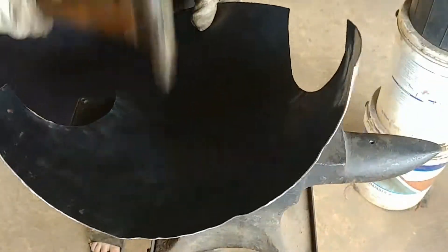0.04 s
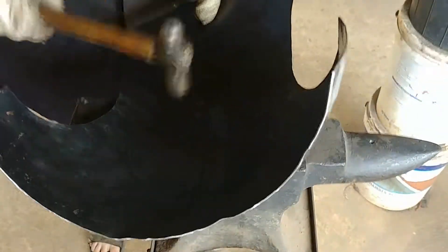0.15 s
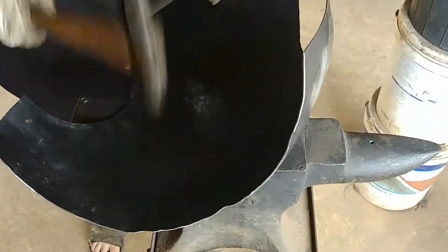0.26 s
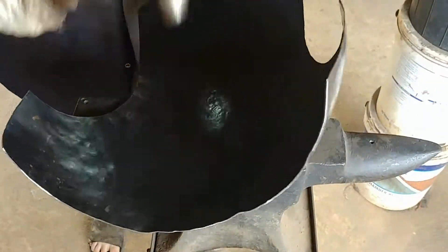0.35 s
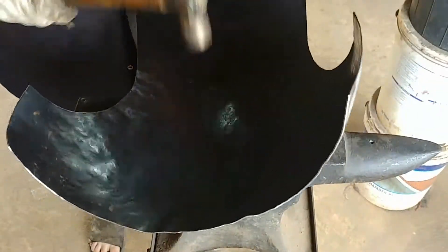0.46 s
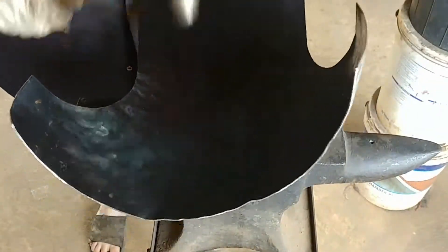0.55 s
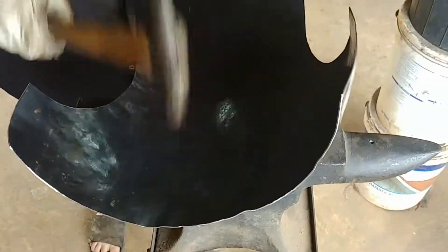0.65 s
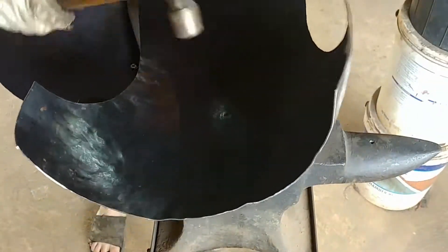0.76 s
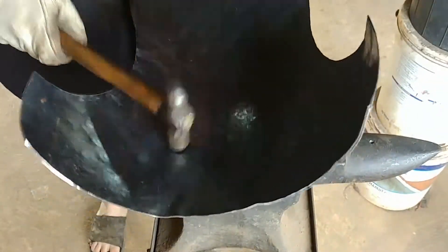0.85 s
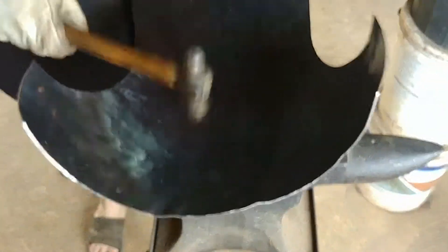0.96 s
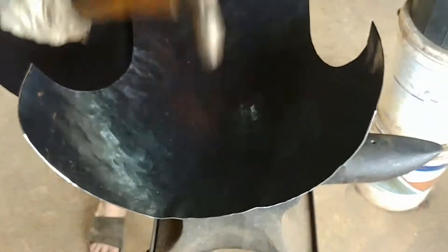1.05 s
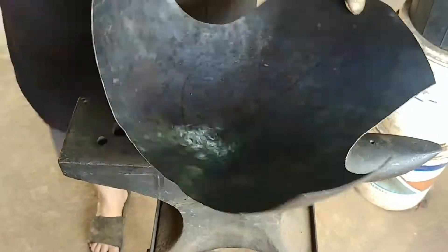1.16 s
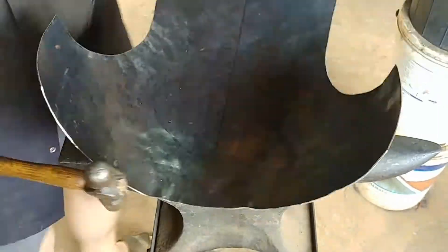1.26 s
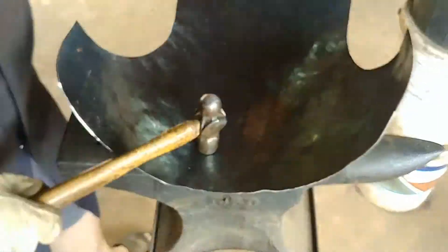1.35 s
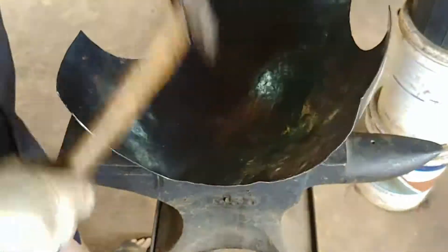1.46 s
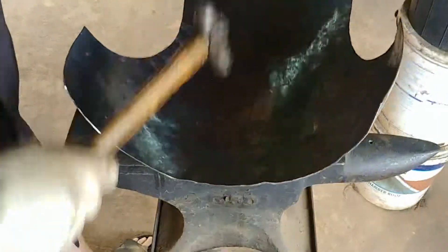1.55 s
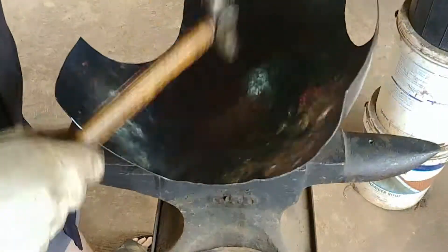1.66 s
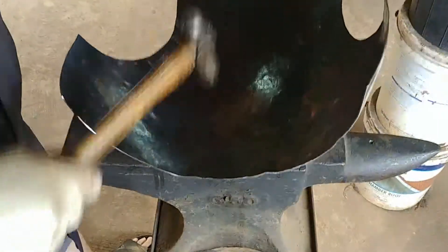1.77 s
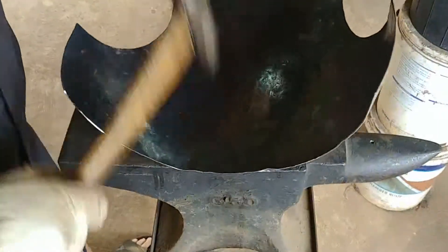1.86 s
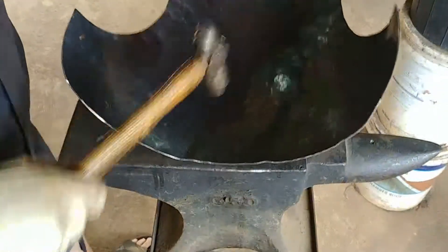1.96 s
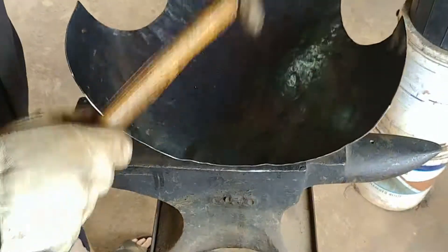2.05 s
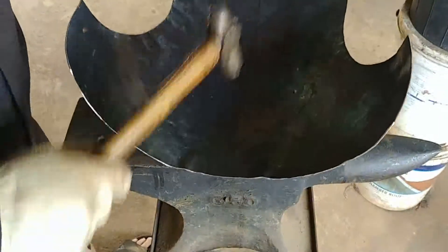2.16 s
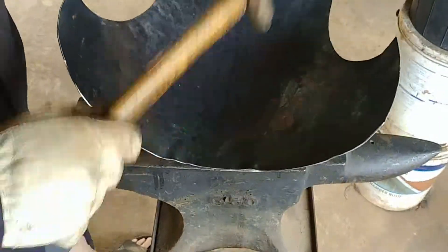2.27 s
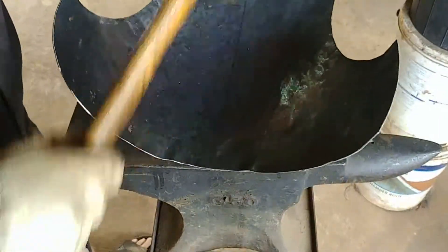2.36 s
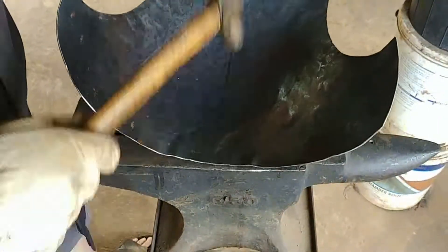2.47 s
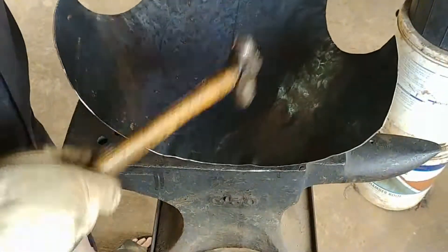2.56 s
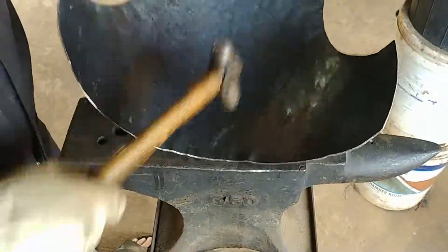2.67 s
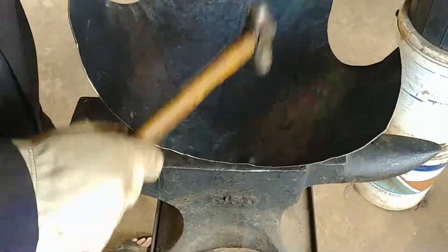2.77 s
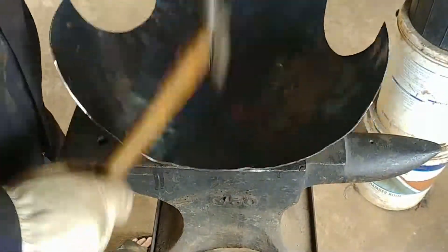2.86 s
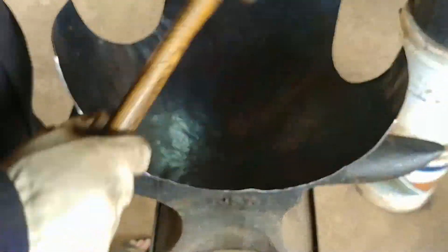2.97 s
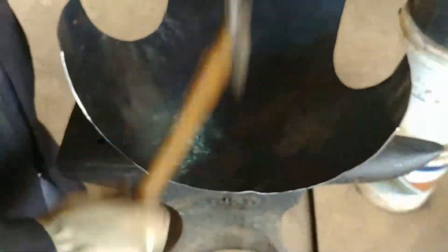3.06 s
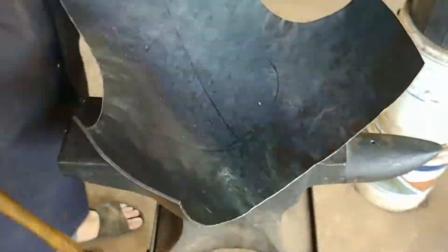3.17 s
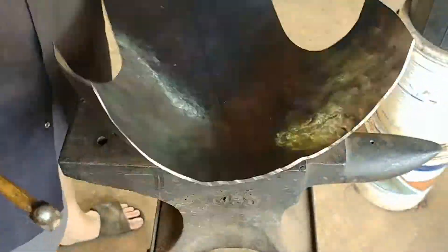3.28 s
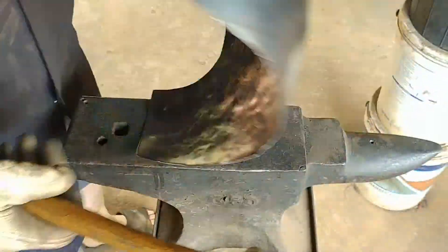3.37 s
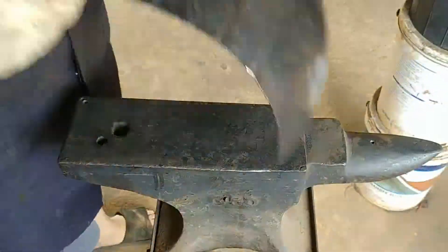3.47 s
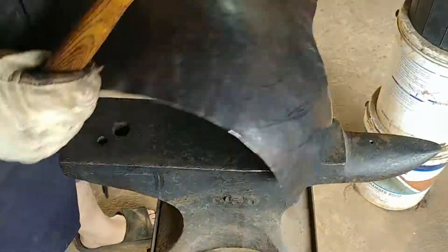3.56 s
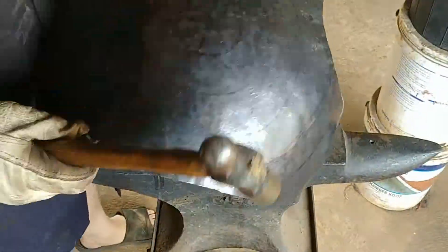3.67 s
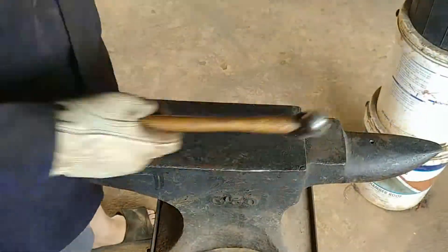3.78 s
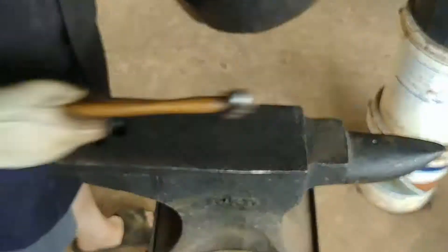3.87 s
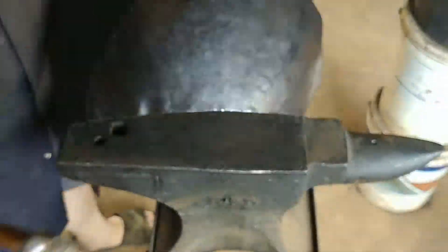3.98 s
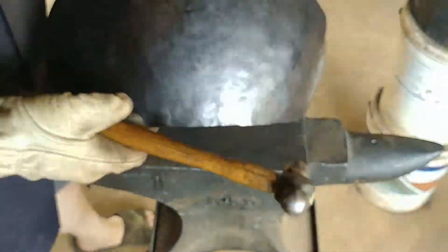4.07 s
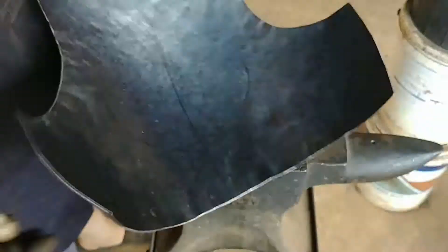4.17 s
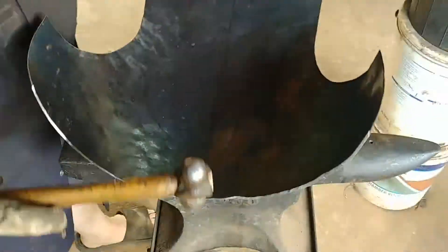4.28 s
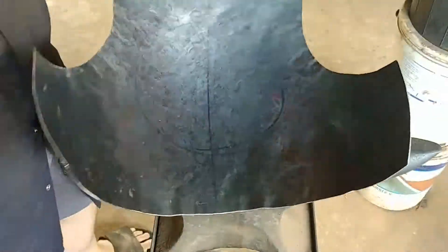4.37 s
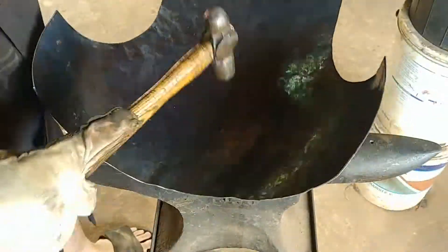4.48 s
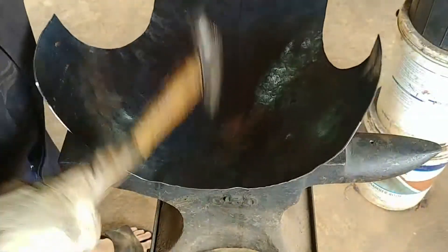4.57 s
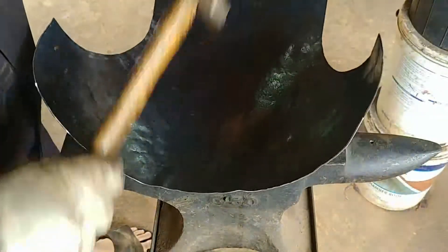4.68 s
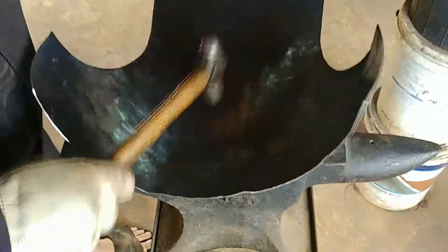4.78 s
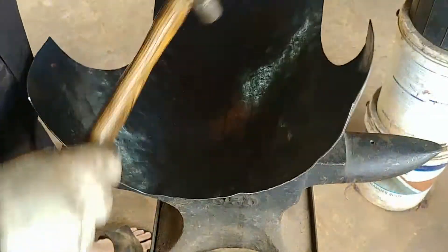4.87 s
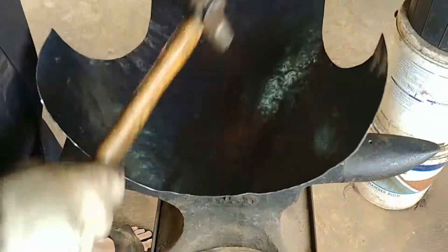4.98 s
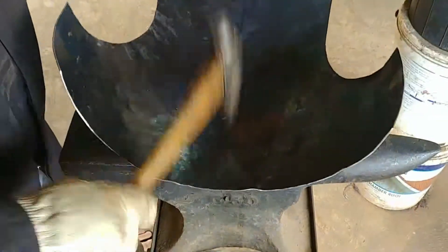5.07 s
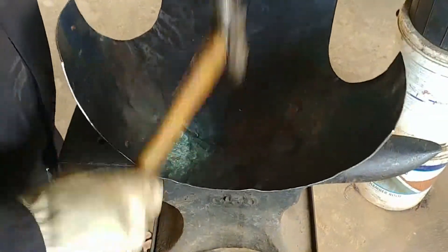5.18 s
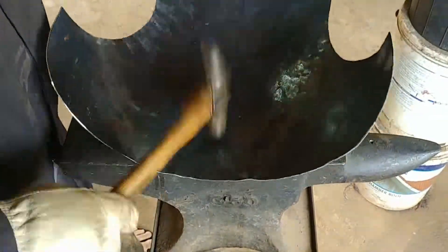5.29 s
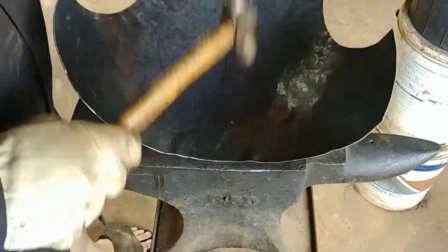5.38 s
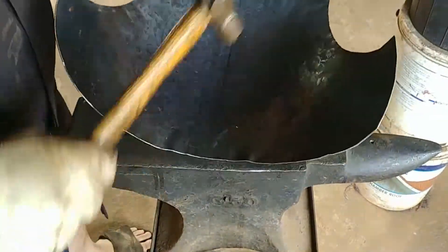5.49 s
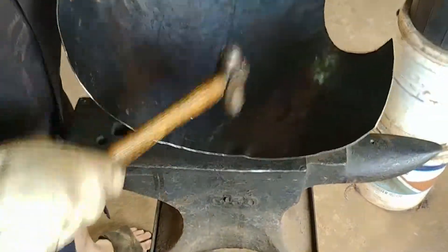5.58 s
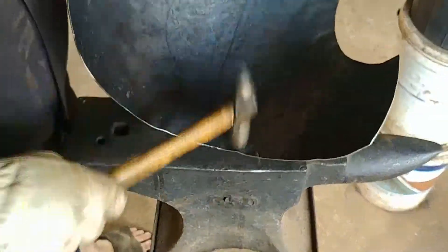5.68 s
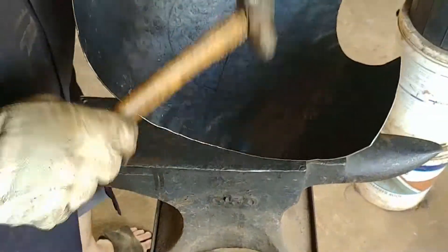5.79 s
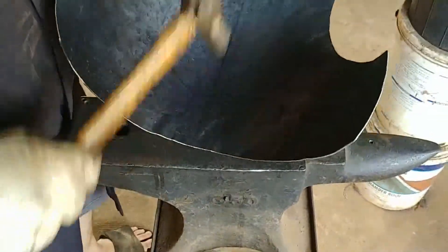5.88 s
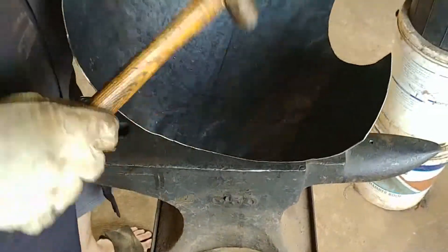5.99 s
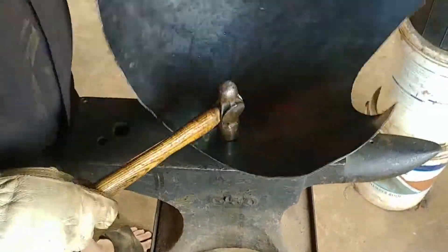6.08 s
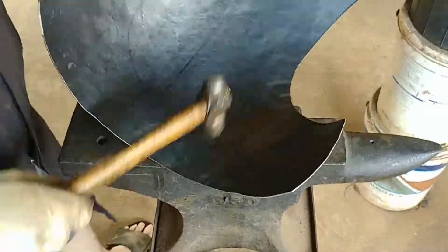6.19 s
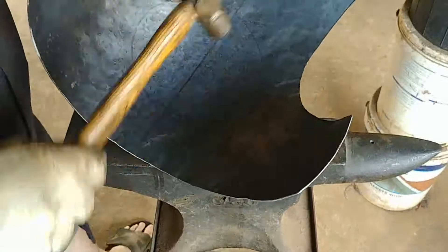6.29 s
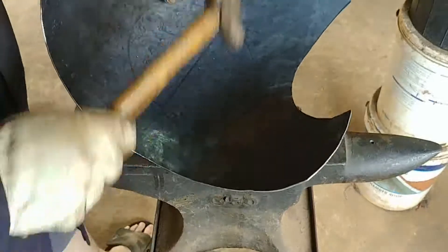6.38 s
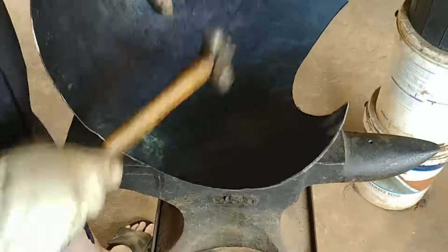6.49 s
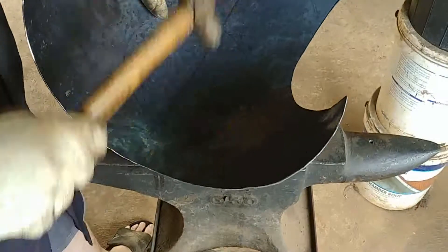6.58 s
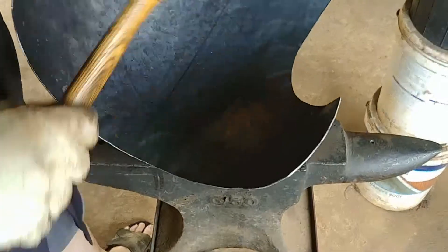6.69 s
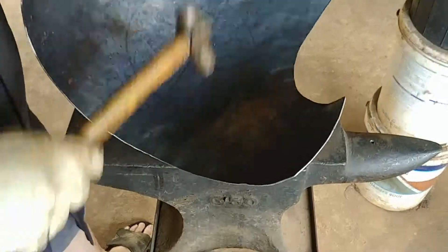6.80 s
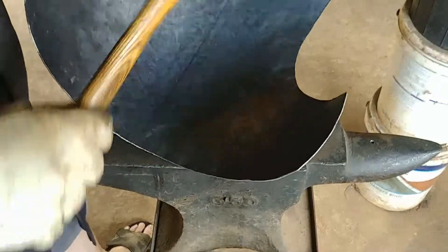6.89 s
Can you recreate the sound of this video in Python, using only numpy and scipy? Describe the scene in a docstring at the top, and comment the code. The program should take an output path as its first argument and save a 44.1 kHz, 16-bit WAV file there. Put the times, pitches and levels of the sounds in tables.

```python
"""Very fast hammering on a curved steel plate over an anvil is heard first, about 28 blows a second.
Each blow excites the plate's modes, a noisy clash, a bending thud, a crack and the anvil's own note.
Gain limiting flattens the blows into short bursts. In the pauses the turned plate knocks, flexes and scrapes,
and steel clinks once as a few decaying sines. A wavering hum and shaped noise form the air of the workshop."""
import sys
import numpy as np
from scipy import signal
from scipy.fft import rfft, irfft, next_fast_len
from scipy.io import wavfile
from scipy.ndimage import uniform_filter1d, map_coordinates

SR = 44100
rng = np.random.default_rng(int(sys.argv[2]) if len(sys.argv) > 2 else 0)


def waveform_to_disk(signal):
    """Save audio, clipped to [-1, 1], as 16-bit WAV at the path in sys.argv[1]."""
    frames = np.transpose(np.atleast_2d(signal))
    scaled = np.clip(frames, -1, 1) * 32767
    samples = np.round(scaled).astype(np.int16)
    wavfile.write(sys.argv[1], SR, samples)


N = 306054

# All table levels are relative: they hold before the mixing trims below and the limiter.
# Stretches of even hammering:
# (first blow [s], blows [count], beat [s], change of beat per blow [s], force [dB])
HAMMER_RUNS = [(-.0239, 34, .0359, .00002, -9.5), (1.5, 37, .03648, -.00002, -8.3),
               (2.837, 9, .0372, 0, -7.5), (4.581, 22, .03601, -.00026, -14), (5.329, 23, .035, 0, -7),
               (6.304, 18, .0372, -.00006, -7.5)]
# Slaps of the whole plate: (time [s], force [dB], thud re force [dB], ring re force [dB])
PLATE_SLAPS = [(1.411, -21, 4, 1), (3.404, -26, 4.5, 7), (3.546, -21, -9, 8.5), (4.009, -24.5, -4, 7),
               (4.027, -27, 1, 5), (4.245, -13.5, -0.5, 2), (4.272, -18, 4, -1.5), (6.117, -5, -2.5, -1.5),
               (6.218, -27, 3.5, -7)]
# Blows that drive the unseated plate onto the anvil: (time [s], thud re force [dB], pitch [Hz])
UNSEATED_THUDS = [(.01, -7.5, 501), (.23, -12.5, 505), (.56, -6.5, 527), (.63, -7, 500), (.66, -10.5, 397),
                  (.81, -11.5, 493), (.88, -4, 430), (.92, -1.5, 795), (.96, -2.5, 438), (1.03, -5.5, 420),
                  (1.5, -5.5, 519), (1.72, -8, 500), (1.94, 0, 467), (2.01, -10, 519), (2.05, -11.5, 498),
                  (2.44, -2, 519), (2.63, -4.5, 332), (2.67, -13, 330), (2.77, -3.5, 810), (2.8, -6, 1050),
                  (2.91, -7, 505), (2.95, 0.5, 495), (3.06, 1.5, 448), (4.58, 3, 538), (4.62, 0.5, 600),
                  (4.76, -6.5, 450), (4.8, -7, 453), (4.83, 2.5, 408), (4.9, -11, 647), (5.0, -9.5, 590),
                  (5.12, -7, 600), (5.19, 1, 378), (5.22, -13, 600), (5.28, 0.5, 335), (6.1, -6, 497),
                  (6.3, 2, 430), (6.34, -3.5, 518), (6.49, -1.5, 337), (6.56, -5, 268), (6.67, -5, 443),
                  (6.78, -4, 1075), (6.89, -5.5, 352)]
# How freely the plate rings as it slides over the anvil: (time [s], mean ring re force [dB])
RING_FREEDOM = [(0, -4.5), (.26, -5.5), (.31, -10), (.44, -4.5), (.51, -14), (.56, -4), (.64, -1.5),
                (.73, -29), (.83, -1), (.91, -10), (1.12, -18), (1.5, -6.5), (1.59, -21), (1.65, -9.5),
                (1.8, -18.5), (1.87, -6.5), (2.04, -3.5), (2.3, -28.5), (2.55, -4), (2.79, -5),
                (2.85, -16.5), (3.14, -29.5), (4.58, -12.5), (4.7, -20), (4.78, -11), (4.93, -25),
                (5.33, -26.5), (5.42, 0), (5.48, -12), (5.59, 1.5), (5.68, -10), (5.77, -4.5), (5.86, -12),
                (6.12, -7), (6.3, -5.5), (6.41, -12.5), (6.47, 2), (6.58, -17), (6.89, -4.5)]
# Drift of the clash's brightest resonance: (time [s], mean frequency at 0 dB ring [Hz])
BRIGHT_DRIFT = [(0, 1700), (.2, 2150), (.36, 2590), (.51, 2800), (.57, 1950), (.66, 1950), (.75, 2730),
                (1.41, 3080), (1.64, 2330), (1.8, 2750), (2.8, 2750), (3.14, 2450), (3.55, 2600),
                (4.02, 3600), (4.7, 2550), (5.2, 2700), (5.55, 2647), (6.9, 3020)]
# Blows where one mode sings out: (time [s], frequency [Hz], level re force [dB])
SINGING_BLOWS = [(.08, 1745, -7), (.16, 1915, -8), (.23, 2234, -10), (.27, 2180, -6), (.34, 2815, -2),
                 (.41, 2450, -7), (.48, 2570, -9.5), (.52, 3197, -4), (.55, 1937, -5), (.59, 1930, -7),
                 (.66, 1835, -6), (.77, 3143, -1), (.81, 3210, -9), (1.03, 2590, -6), (1.54, 3025, -2),
                 (1.65, 2676, -5), (1.9, 2750, -12), (2.01, 1753, -13), (2.12, 3020, -5.5),
                 (2.15, 2995, -0.5), (2.41, 3262, -5), (2.8, 1456, -12.5), (4.65, 3130, 0),
                 (4.72, 3490, -2.5), (5.4, 1198, -13), (5.51, 2810, -2.5), (5.58, 1835, -5),
                 (5.65, 2800, 3.5), (5.75, 1178, -17), (5.93, 1830, -9), (6.06, 1820, -5.5),
                 (6.1, 1200, -13.5), (6.3, 1190, -3), (6.34, 1200, -1), (6.45, 2800, -8), (6.53, 2637, -7),
                 (6.6, 2088, -12), (6.75, 3133, -6), (6.82, 3273, -3), (6.86, 1190, -9), (6.89, 1191, -4)]
# Modes of the plate: (frequency [Hz], level struck in the bowl [dB], level struck nearer the rim [dB])
PLATE_MODES = [(807, -9, -8), (1195, -.5, 6.5), (1446, -3, 3.5), (1762, -5, -13), (1838, .5, -13),
               (1922, -9, -12), (2087, -11, -.5), (2398, -6, -8), (2593, -5, -5), (2805, -5, -5),
               (3033, -6, -4)]
# Spectrum of the clash of steel: (frequency [Hz], level [dB])
CLASH_SPECTRUM = [(100, -30), (400, -21.5), (1000, -19.5), (1600, -21), (2200, -7), (3200, -1), (4100, -1),
                  (6000, -1.5), (7900, -3), (9000, -12), (10300, -28.5), (12000, -25.5), (15800, -22.5)]
# Spectrum of the thud: (frequency [Hz], level [dB])
THUD_SPECTRUM = [(50, -11), (150, -9), (290, -1), (480, 0.5), (700, -2), (1100, -7), (1700, -18),
                 (3000, -59)]
# Spectrum of the plate's close modes: (frequency [Hz], level [dB])
BODY_SPECTRUM = [(400, -22), (900, -11), (1500, -8.5), (1900, -5), (2500, -4), (3100, -3.5), (4500, -8),
                 (9000, -55)]
# Spectrum of the hammer's crack: (frequency [Hz], level [dB])
CRACK_SPECTRUM = [(1500, -9), (5000, 0), (14000, -4.5)]
# Spectrum of low thumps and hum noise: (frequency [Hz], level [dB])
RUMBLE_SPECTRUM = [(25, -8), (60, -2), (130, 0.5), (250, -9), (600, -38), (2000, -69)]
# Spectrum of the room air: (frequency [Hz], level [dB])
AIR_SPECTRUM = [(25, -16), (100, -4), (250, -4.5), (600, -4.5), (1000, -12), (3000, -24.5), (7500, -38.5),
                (9500, -51), (15000, -57)]
# Level of the hum and its low noise: (time [s], level [dB])
HUM_LEVEL = [(0, -61), (1.3, -57), (2.2, -54.5), (3.45, -60), (3.6, -66), (3.82, -61.5), (3.95, -54),
             (4.1, -64.5), (4.7, -56.5), (6.94, -60.5)]
# Short booms of the flexing plate: (time [s], frequency [Hz], level [dB])
PLATE_FLEXES = [(.932, 230, -20), (1.205, 400, -34), (2.058, 490, -12), (2.645, 340, -19),
                (3.192, 330, -37), (3.260, 1500, -43), (3.332, 312, -23), (3.351, 308, -31),
                (3.378, 338, -30), (3.396, 308, -22), (3.492, 1200, -39), (4.286, 310, -20),
                (4.366, 478, -32), (4.386, 1050, -43), (4.484, 311, -22.5), (4.523, 1240, -42),
                (4.844, 262, -19.5), (5.204, 220, -19.5), (5.296, 270, -23), (6.170, 330, -30),
                (6.234, 300, -35), (6.678, 430, -17)]
# Light contacts of the turned plate: (time [s], clatter level [dB], thud level [dB])
LIGHT_KNOCKS = [(1.333, -26.5, -37), (1.366, -42, -44.5), (1.407, -40, -42), (3.2604, -39.5, -53),
                (3.340, -38.5, -40), (3.388, -38, -43.5), (3.492, -44, -49), (3.62, -49, -63),
                (3.7479, -49, -55), (3.761, -51, -59), (3.788, -51, -66), (3.8462, -22.5, -61),
                (4.1765, -30.5, -47.5), (4.205, -50, -62), (4.324, -50, -49), (4.368, -49, -47),
                (4.388, -47, -47), (4.4924, -41, -43.5), (4.5234, -47, -55), (4.547, -60, -53),
                (6.213, -31.5, -45), (6.25, -29.5, -47)]
# Spectrum of the hollow knock: (frequency [Hz], level [dB])
HOLLOW_SPECTRUM = [(100, -36), (220, -11), (310, 2.5), (420, 0), (600, -9.5), (1100, -16), (2500, -36),
                   (8000, -66.5)]
# Slides of the plate's edge over the anvil: (time [s], length [s], level [dB])
EDGE_SCRAPES = [(3.875, .04, -62), (3.916, 0.046, -53.5), (4.345, 0.085, -61), (4.417, 0.031, -58)]
# Modes of the bare steel clink: (frequency [Hz], level [dB], decay t60 [s])
CLINK_MODES = [(2396, -32, .04), (3068, -32, .04), (4900, -22, .055), (5010, -25, .045), (5642, -33, .035),
               (7989, -39, .043)]
# Likeness of the left and right channels: (frequency [Hz], correlation [1])
STEREO_LIKENESS = [(100, 0.03), (4300, 0.03), (4550, .68), (7000, .68), (7700, .24), (9000, .66),
                   (13000, .72)]
# Level of left over right: (frequency [Hz], level [dB])
STEREO_LEAN = [(300, 2.5), (600, 1.3), (1200, 3), (2500, 1), (6000, -0.5), (7000, -1.5), (7700, 8),
               (8600, 0.3), (12000, 0.5)]

SIZE = 8192  # samples in each short sound
T = np.arange(SIZE) / SR  # its time [s]
BEAT_SCATTER_S, FORCE_SCATTER_DB, RING_SCATTER_DB = .0008, 1.2, 3  # blow to blow
SEATED_THUD_DB, THUD_SCATTER_DB, SEATED_HZ = -22, 3.5, 449.7  # means and scatter for all other blows
GIVE_DB = 0  # the thud at which the plate's giving way takes half of a blow's energy
RIM_FROM_S = 6.2  # blows land nearer the rim after this
GRIP_FROM_S, GRIP_TO_S = 3.3, 4.4  # the glove damps the modes while the plate is turned over
BEND_SHARE = 0.67  # how far the low modes follow the thud rather than the ring
FREE_CRACK_DB, CRACK_GROWS = -22.5, 0.13  # mean at 0 dB ring, and dB more per dB of lost ring
FLAT_FROM_S, FLAT_TO_S, FLAT_CRACK_DB = 2.97, 3.12, 7  # held flat, the plate meets the hammer's face hard
SLAP_CRACK_DB = -12  # the broad plate lands more softly than the hammer's face
RISE_HZ_PER_DB = 30.5  # the bright resonance rises as the pinned plate rings less
THUD_LAG_S, BEND_LAG_S = .0033, .007  # the plate lands after first contact, its slow bending comes last
CONTACTS_PER_S, CONTACT_S = 650, .001  # rattling contacts, and their time constant
ANVIL_HZ, ANVIL_DB, ANVIL_T60 = 8397, -28.5, .11  # the anvil's own note, mean level re force, decay [s]
LOOSE_FROM_S, LOOSE_TO_S, LOOSE_STRETCH = 4.94, 5.23, 1.45  # a loose plate chatters on for longer
CLINK_AT_S = 3.963
TOP_HZ = 15900  # band limit


def amp(db):
    """Level: 20 dB is a tenfold amplitude."""
    return 10 ** (np.asarray(db) / 20)


def unit(x):
    """Normalization: the signal is scaled to rms 1."""
    return x / np.sqrt(np.mean(x ** 2) + 1e-20)


def along(points, hz):
    """Logarithmic frequency: a curve is interpolated evenly per octave."""
    f, value = np.transpose(points)
    return np.interp(np.log(hz + 1), np.log(f), value)


def curve(table, s):
    """Interpolation in time: a two-column table is read at s seconds."""
    return np.interp(s, *np.transpose(table))


def row_at(table, s):
    return next((row for row in table if abs(row[0] - s) < .018), None)


def wander(position):
    """Random fluctuation: a smooth curve has one random knot per whole position."""
    return map_coordinates(rng.standard_normal(int(position[-1]) + 4), [position], mode="nearest")


def noise(spectrum, size, ripple_db=0, ripple_hz=200, dull_hz=SR):
    """Filtered noise of rms 1: ripple mimics unevenly excited crowded modes, and soft contact dulls it."""
    hz = np.fft.rfftfreq(size, 1 / SR)
    level_db = along(spectrum, hz) + ripple_db * wander(hz / ripple_hz)
    colour = amp(level_db) / (1 + (hz / dull_hz) ** 2)
    alike = np.clip(along(STEREO_LIKENESS, hz), -1, 1)
    # shared and opposed noise set the correlation of the two channels
    mid, side = rfft(rng.standard_normal((2, size))) * colour * np.sqrt([1 + alike, 1 - alike])
    lean = amp(along(STEREO_LEAN, hz) / 2)
    return unit(irfft([(mid + side) * lean, (mid - side) / lean], size))


def fade(t, attack, t60):
    """Damping: a rounded rise precedes an exponential decay of 60 dB per t60."""
    return (1 - np.exp(-t / attack)) ** 2 * amp(-60 * t / t60)


def tones(hz, gains, t):
    """Modal superposition: each mode is a sine with its own random phase in each channel."""
    phase = rng.uniform(0, 2 * np.pi, (2, len(hz), 1))
    return gains[:, None] * np.sin(2 * np.pi * hz[:, None] * t + phase)


def pair(hz, split, second_db):
    """Beating: two neighbouring modes interfere."""
    return tones(hz * np.array([1, 1 + split]), amp([0, second_db]), T).sum(1)


def peak(hz, width_hz):
    """Resonance: the response falls away on both sides of one frequency, as (Hz, dB) points."""
    f = np.geomspace(20, SR / 2, num=512)
    return np.transpose([f, -20 * np.log10(1 + ((f - hz) / width_hz) ** 2)])


def crowded(spectrum, depth_db, spacing_hz):
    """Modal density: many close modes give a spectrum fine, lasting peaks."""
    hz = np.linspace(20, SR / 2, num=4096)
    return np.transpose([hz, along(spectrum, hz) + depth_db * wander(hz / spacing_hz)])


def add(track, s, sound):
    """Linear superposition: a sound is summed into the track at s seconds."""
    start = round(s * SR)
    sound = sound[:, max(-start, 0):]
    part = track[:, max(start, 0):][:, :sound.shape[1]]
    part += sound[:, :part.shape[1]]


def blows():
    """Energy sharing: an even beat as (s, force, thud, ring dB), weaker where the plate gives way."""
    rows = []
    for first_s, count, beat_s, change_s, run_db in HAMMER_RUNS:
        for k in range(round(count)):
            late, harder, looser, freer = rng.standard_normal(4)
            s = first_s + k * (beat_s + change_s * k / 2) + BEAT_SCATTER_S * late
            landing = row_at(UNSEATED_THUDS, s)
            thud_db = landing[1] if landing else SEATED_THUD_DB + THUD_SCATTER_DB * looser
            given_db = 10 * np.log10(1 + amp(thud_db - GIVE_DB) ** 2)
            force_db = run_db + FORCE_SCATTER_DB * harder - given_db
            ring_db = curve(RING_FREEDOM, s) + RING_SCATTER_DB * freer
            rows.append((s, force_db, thud_db, ring_db))
    return rows


def rattle(depth):
    """Repeated impact: random abrupt contacts, each dying quickly, modulate the clash."""
    hits = (rng.random(SIZE) < CONTACTS_PER_S / SR) * rng.uniform(0, 1.75, SIZE)
    power = signal.lfilter([1], [1, -np.exp(-2 / (CONTACT_S * SR))], hits)
    return unit(np.sqrt(1 + abs(depth) * power))


def bright_resonance(s, ring_db):
    """Selective resonance: one mode sings out, or a drifting band of noise stands above the clash."""
    ping = row_at(SINGING_BLOWS, s)
    if ping:
        _, hz, ping_db = ping
        sung = pair(hz, split=.022, second_db=-8) + amp(-3) * noise(peak(hz, width_hz=110), SIZE)
        return amp(ping_db - 1) * sung
    hz = (curve(BRIGHT_DRIFT, s) - RISE_HZ_PER_DB * ring_db) * (1 + rng.normal(0, .05))
    return amp(-9.5 + rng.normal(0, 2)) * noise(peak(hz, width_hz=200), SIZE)


def clash(s, ring_db, steel):
    """Dense modal excitation: chattering contact yields uneven, quickly damped noise."""
    stretch = LOOSE_STRETCH if LOOSE_FROM_S < s < LOOSE_TO_S else 1
    # the clash dies fast, and the workshop keeps a faint tail
    decay = 1.36 / stretch * fade(T, attack=.0055, t60=.069 * stretch)
    decay = decay + amp(-32) * fade(T, attack=.0041, t60=.18)
    # every blow lands on a new spot and favours other modes
    crowd = noise(steel, SIZE, ripple_db=2.1, ripple_hz=330)
    return (crowd * rattle(depth=2.0) + bright_resonance(s, ring_db)) * decay


def thud(s):
    """Flexural vibration: the plate lands on the anvil and bends as a whole."""
    landing = row_at(UNSEATED_THUDS, s)
    hz = landing[2] if landing else SEATED_HZ * np.exp(rng.normal(0, .3))
    bend = pair(hz, split=.2, second_db=-7) * fade(np.maximum(T - BEND_LAG_S, 0), attack=.0055, t60=.075)
    impact = noise(THUD_SPECTRUM, SIZE, ripple_db=2.5, ripple_hz=69.7)
    impact = impact * fade(np.maximum(T - THUD_LAG_S, 0), attack=.005, t60=.078)
    return amp(-1.5) * impact + amp(-5.5) * bend


def plate_ring(s, thud_db, ring_db):
    """Free vibration: a few clear modes ring over a cluster of close ones."""
    hz, bowl_db, rim_db = np.transpose(PLATE_MODES)
    mode_db = (rim_db if s > RIM_FROM_S else bowl_db) + rng.normal(0, 2.85, len(hz))
    # the low modes need a blow that also bends the plate
    mode_db = mode_db + (hz < 1500) * BEND_SHARE * min(thud_db - ring_db, 0)
    mode_db = mode_db - 12 * (GRIP_FROM_S < s < GRIP_TO_S)
    # each new contact detunes the modes a little
    detuned = hz * (1 + rng.normal(0, .003, len(hz)))
    modes = tones(detuned, amp(mode_db), T).sum(1) * fade(T, attack=.006, t60=.085)
    body = noise(BODY_SPECTRUM, SIZE, ripple_db=4.5, ripple_hz=111.6) * fade(T, attack=.004, t60=.088)
    return amp(-5.0) * modes + amp(-3.0) * body


def anvil_note():
    """Normal mode: the anvil answers each blow with one high decaying sine."""
    level = amp(ANVIL_DB + rng.normal(0, 3))
    return level * np.sin(2 * np.pi * ANVIL_HZ * T) * fade(T, attack=.004, t60=ANVIL_T60)


def crack(s, ring_db, is_slap):
    """Contact stiffness: the first hard contact cracks, louder where the pinned plate rings less."""
    db = FREE_CRACK_DB - CRACK_GROWS * ring_db + FLAT_CRACK_DB * (FLAT_FROM_S < s < FLAT_TO_S)
    db = db + SLAP_CRACK_DB * is_slap + rng.normal(0, 4)
    return amp(db) * noise(CRACK_SPECTRUM, SIZE) * fade(T, attack=.0016, t60=.026)


def stand_thump():
    """Structure-borne sound: the anvil's stand passes a low thump to the floor."""
    return noise(RUMBLE_SPECTRUM, SIZE) * fade(T, attack=.0098, t60=.11)


def hammering():
    """Impact excitation: each blow or slap sums the responses of hammer, plate, anvil and stand."""
    out = np.zeros((2, N))
    steel = crowded(CLASH_SPECTRUM, depth_db=1.2, spacing_hz=35)
    for blow in blows() + PLATE_SLAPS:
        s, force_db, thud_db, ring_db = blow
        sound = crack(s, ring_db, is_slap=blow in PLATE_SLAPS) + clash(s, ring_db, steel) + anvil_note()
        sound = sound + amp(thud_db - 1) * thud(s)
        sound = sound + amp(ring_db) * plate_ring(s, thud_db, ring_db)
        sound = sound + amp(-25.0) * stand_thump()
        add(out, s, amp(force_db) * sound)
    return out


def workshop():
    """Modulation: an electric hum wavers in level and phase over the broadband air of the room."""
    t = np.arange(N) / SR
    waver = amp(1.8 * wander(t * 18) - .5)
    hum_hz = 105
    hum = np.array([np.sin(2 * np.pi * hum_hz * t + .92 * wander(t * 14)) for _ in range(2)])
    low = amp(2.5) * waver * hum + amp(-1.5) * noise(RUMBLE_SPECTRUM, N)
    return amp(curve(HUM_LEVEL, t)) * low + amp(-59) * noise(AIR_SPECTRUM, N)


def flexing():
    """Plate bending: the loose plate booms briefly on two neighbouring modes."""
    out = np.zeros((2, N))
    for s, hz, db in PLATE_FLEXES:
        boom = pair(hz, split=.18, second_db=-6) * fade(T, attack=.0051, t60=.059)
        add(out, s, amp(db + 1) * boom)
    return out


def knocking():
    """Soft impact: light contact gives a short, dull clatter and a hollow knock."""
    out = np.zeros((2, N))
    for s, clatter_db, thud_db in LIGHT_KNOCKS:
        decay = fade(T, attack=.0013, t60=.035) + amp(-20.5) * fade(T, attack=.0044, t60=.16)
        clatter = noise(CLASH_SPECTRUM, SIZE, ripple_db=2.5, ripple_hz=301, dull_hz=6800)
        clatter = clatter + noise(BODY_SPECTRUM, SIZE)
        knock = noise(HOLLOW_SPECTRUM, SIZE, ripple_db=2.5, ripple_hz=80.8)
        knock = knock * fade(T, attack=.002, t60=.049)
        add(out, s, amp(clatter_db - 5.0) * clatter * decay + amp(thud_db + 11) * knock)
    return out


def scraping():
    """Sliding friction: irregular catches modulate noise as the plate's edge slides over the anvil."""
    out = np.zeros((2, N))
    for s, length, db in EDGE_SCRAPES:
        catches = unit(amp(4 * wander(T * 400)))
        swell = np.sin(np.pi * np.minimum(T / length, 1))
        add(out, s, amp(db) * swell * catches * noise(CLASH_SPECTRUM, SIZE, dull_hz=7500))
    return out


def clink():
    """Modal decay: hard steel meets steel once and rings on a few clean modes, two of which beat."""
    out = np.zeros((2, N))
    ring = np.zeros(SIZE)
    for hz, db, t60 in CLINK_MODES:
        ring += amp(db) * np.sin(2 * np.pi * hz * T) * fade(T, attack=.0018, t60=t60)
    tick = noise(CLASH_SPECTRUM, SIZE) * fade(T, attack=.0019, t60=.036)
    add(out, CLINK_AT_S, ring + amp(-28.5) * tick)
    return out


def limiter(x, ceiling_db, ratio, bass_db, window, ahead):
    """Gain control: level past the ceiling lowers the gain a moment early, and bass counts for less."""
    bass = signal.sosfiltfilt(signal.butter(2, 900, fs=SR, output="sos"), x)
    sensed = x + (amp(bass_db) - 1) * bass
    power = np.abs(uniform_filter1d(np.mean(sensed ** 2, 0), max(int(window * SR), 8)))
    # the squared power ratio makes a soft knee
    gain = (1 + (power / amp(ceiling_db) ** 2) ** 2) ** (-(1 - 1 / ratio) / 4)
    early = np.interp(np.arange(N) + ahead * SR, np.arange(N), gain)
    return x * np.minimum(gain, early)


def scene():
    """Superposition: the limited steel sounds are added to the workshop."""
    steel = hammering() + flexing() + knocking() + scraping() + clink()
    steel = limiter(steel, ceiling_db=-28.7, ratio=8.2, bass_db=-2, window=.004, ahead=.00058)
    return steel + workshop()


def record(dry):
    """Band limiting: a very steep low-pass removes the highest treble."""
    size = next_fast_len(N + 8192)
    passed = 1 / (1 + (np.fft.rfftfreq(size, 1 / SR) / TOP_HZ) ** 160)
    return irfft(rfft(dry, size) * passed, size)[:, :N]


dry = scene()
out = record(dry)
waveform_to_disk(out)
```